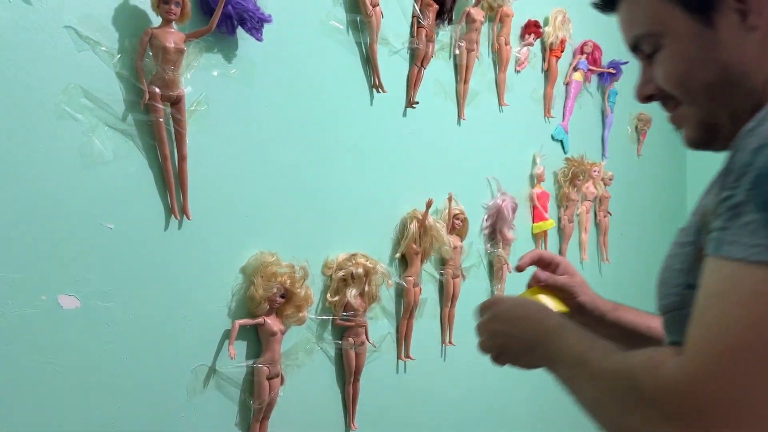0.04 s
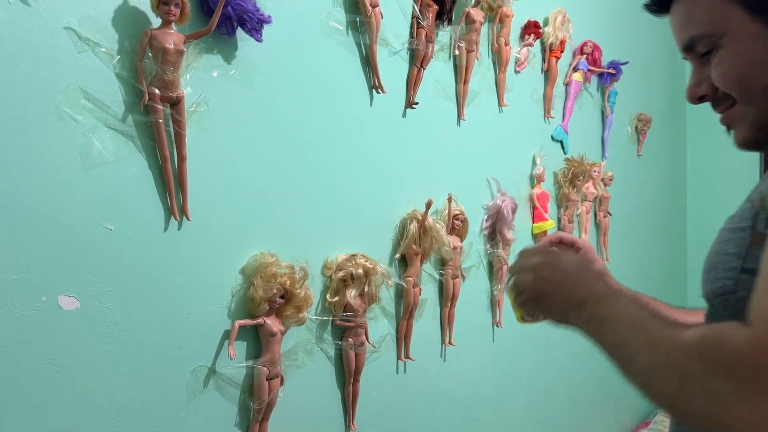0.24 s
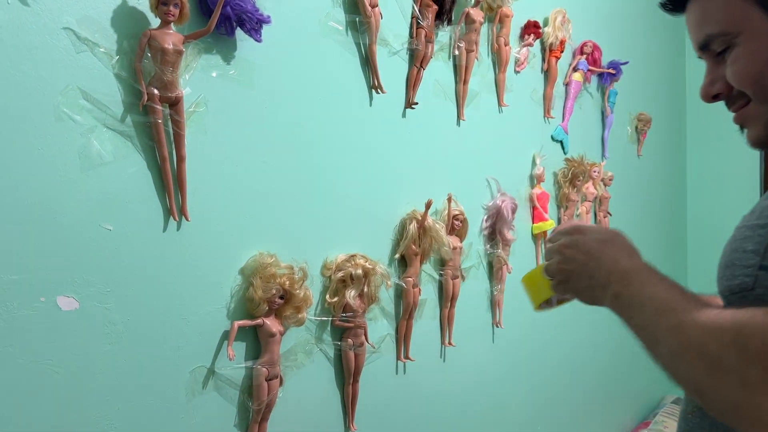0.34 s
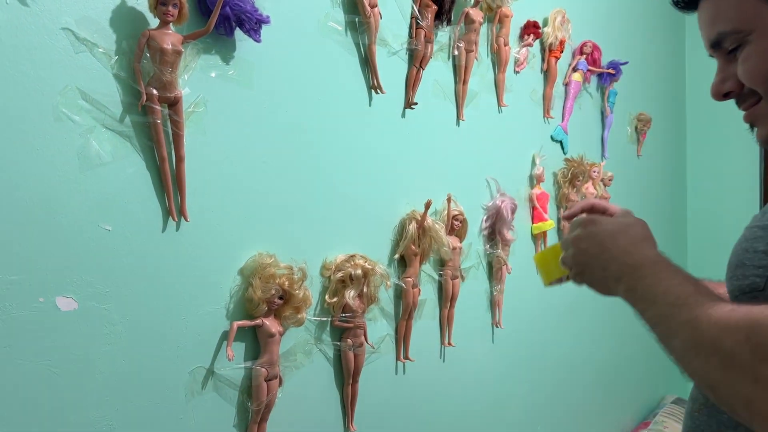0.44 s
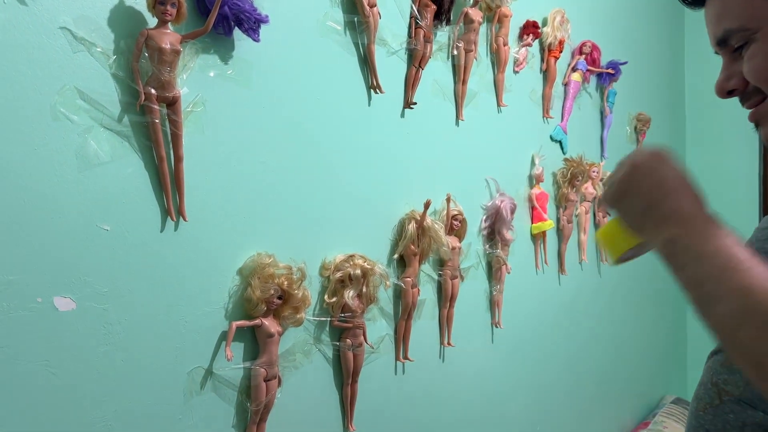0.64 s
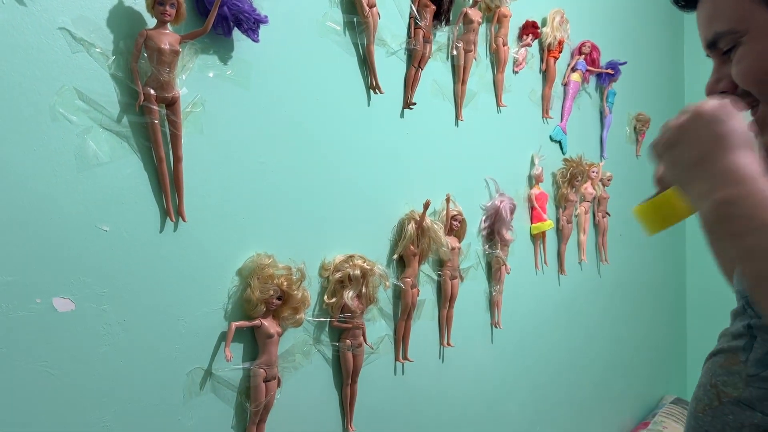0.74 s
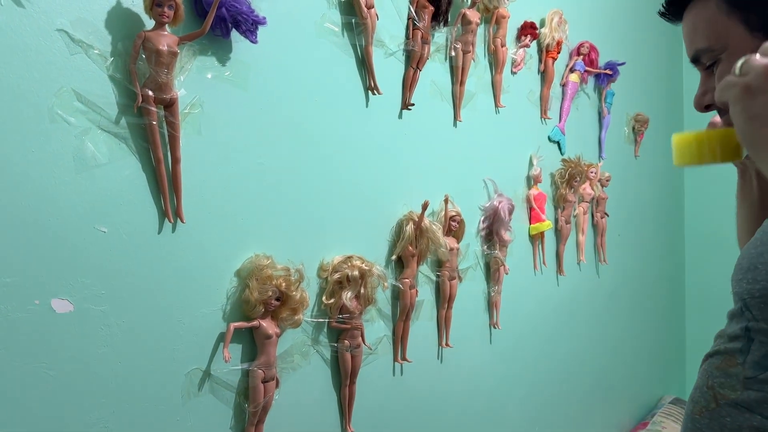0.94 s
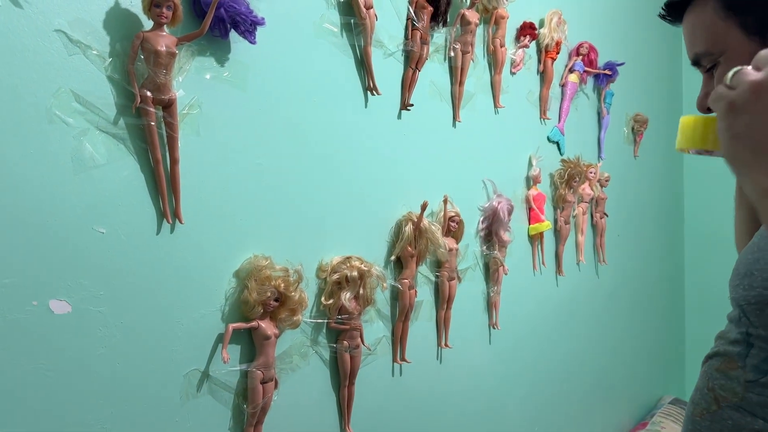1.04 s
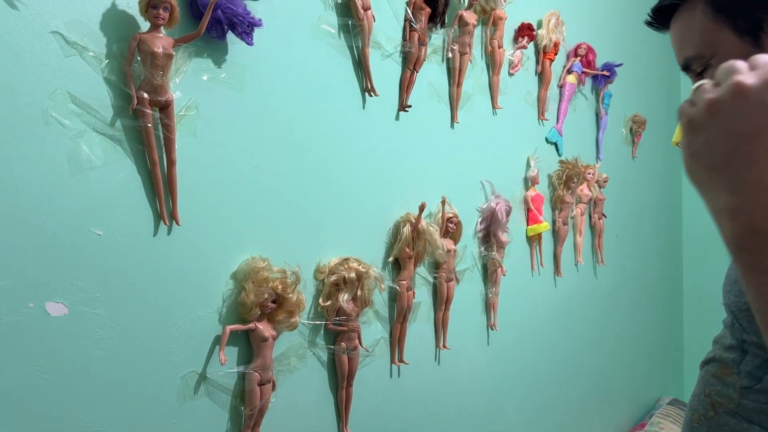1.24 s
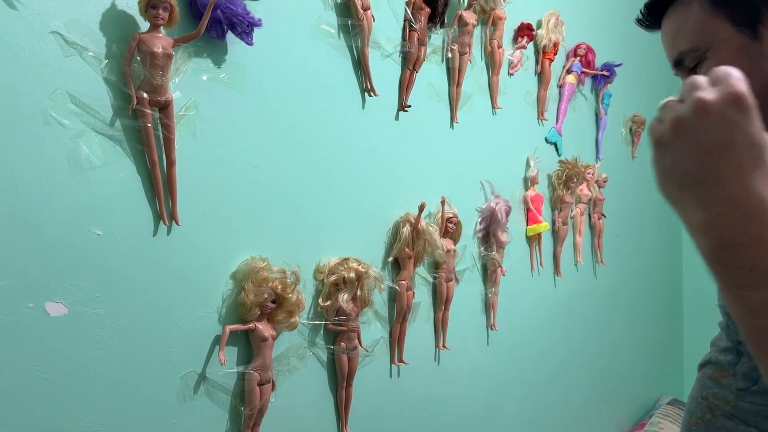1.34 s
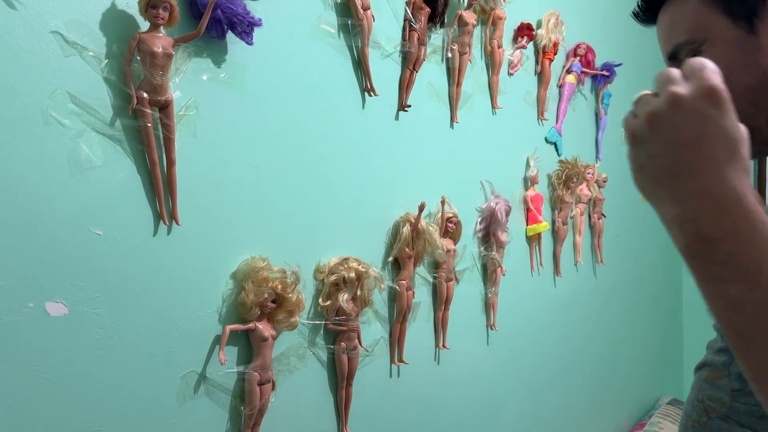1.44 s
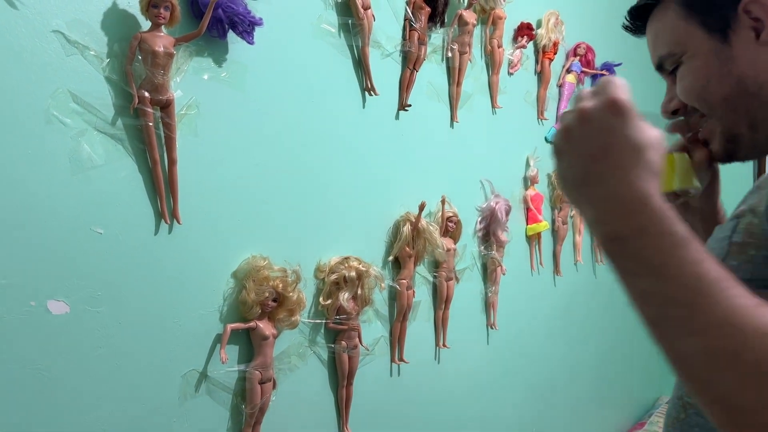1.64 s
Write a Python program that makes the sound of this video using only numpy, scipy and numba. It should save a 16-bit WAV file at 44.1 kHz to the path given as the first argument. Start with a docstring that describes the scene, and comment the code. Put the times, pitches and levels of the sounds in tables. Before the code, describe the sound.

Sticky tape pulled off its roll: faint finger picking, a very short rip, a longer deepening one, then stuttering snaps and a last brief rip, close to a stereo microphone in a small, lively room.

```python
"""Clear tape is pulled off its roll in three short rips with a stutter of single snaps between, in a small room.
The glue lets go in dense uneven slips (clumped clicks); the free strip, a moving resonance, radiates them,
reaching lower as it lengthens. Now and then the slips fall into step and squeal (wavering overtones).
The left microphone of a pair hears it first. Fingers pick at the tape end at the start;
filtered noise makes a faint room tone, and a faint thin sine comes late on."""
import sys
import numpy as np
from scipy import signal
from scipy.fft import rfft, irfft, next_fast_len
from scipy.io import wavfile
from scipy.ndimage import uniform_filter1d
from numba import njit

SR = 44100
rng = np.random.default_rng(int(sys.argv[2]) if len(sys.argv) > 2 else 0)


def rack_gain(trim_db):
    """Turn a fader trim in dB into the linear factor to multiply a signal by."""
    fader = np.asarray(trim_db, float)
    return 10 ** (fader / 20)


def inscribe(sig):
    """Save sig as 16-bit PCM at rate SR to the path in sys.argv[1].

    A 1-D sig is mono; a 2-D sig holds one channel per row.
    Samples are clipped to [-1, 1] before scaling.
    """
    pcm = np.round(np.clip(np.atleast_2d(sig).T, -1, 1) * 32767)
    wavfile.write(sys.argv[1], SR, pcm.astype(np.int16))


N = 74970


def evened(x):
    """Scales to unit rms."""
    return x / np.sqrt(np.mean(x ** 2) + 1e-20)


def read(points, hz):
    """Interpolates a (f/Hz, value) table over log frequency."""
    f, value = np.transpose(points)
    return np.interp(np.log(hz + 1), np.log(f + 1), value)


def level(curve):
    """Gain over time from a (t/s, level/dB) table; silent outside it."""
    s, db = np.transpose(curve)
    return rack_gain(np.interp(np.arange(N) / SR, s, db, -200, -200))


def add(mix, s, sound):
    """Adds a sound to the mix in place at s seconds, cut off at the end."""
    part = mix[round(s * SR):][:len(sound)]
    part += sound[:len(part)]


def coloured(x, points):
    """Causal minimum-phase filter of unit energy, coloured by a (f/Hz, level/dB) table."""
    hz = abs(np.fft.fftfreq(4096, 1 / SR))
    log_gain = np.log(rack_gain(read(points, hz)))
    taps = np.fft.ifft(np.exp(np.conj(signal.hilbert(log_gain)))).real[:2048]
    return signal.oaconvolve(x, taps / np.linalg.norm(taps))[:len(x)]


@njit
def swept(x, hz, damping, rate):
    """Moving two-pole filter: what lies above hz, and what rings at hz."""
    above, ring, a, b = np.zeros(len(x)), np.zeros(len(x)), 0., 0.
    for i in range(len(x)):
        g = np.tan(np.pi * hz[i] / rate)
        above[i] = (x[i] - (damping + g) * a - b) / (1 + g * (damping + g))
        ring[i] = g * above[i] + a
        low = g * ring[i] + b
        a, b = ring[i] + g * above[i], low + g * ring[i]
    return above, ring * damping


def tape():
    """Slips and snaps take the colour of the film and pass the free strip, which rings at its lowest resonance."""
    # one list per rip: t/s, level/dB
    pulls = [
        [(.201, -38.5), (.21, -34), (.226, -23), (.232, -19.5), (.25, -11.5), (.265, -16.5), (.285, -16),
         (.296, -41.5)],
        [(.6172, -9.5), (.628, -21), (.64, -17), (.65, -14), (.656, -14), (.668, -20), (.684, -15), (.696, -14),
         (.715, -19), (.74, -13.5), (.78, -17.5), (.85, -19), (.92, -18.5), (.965, -25.5)],
        [(1.2285, -16), (1.236, -21), (1.245, -28), (1.26, -22.5), (1.29, -21), (1.31, -23), (1.325, -21)],
    ]
    # fingers picking at the tape end: t/s, level/dB
    picking = [(0, -48.5), (.04, -55), (.055, -51), (.075, -55.5), (.09, -56), (.11, -53), (.15, -69)]
    # colour of the peeling film: f/Hz, relative level/dB
    film = [(100, -18.5), (300, -13), (700, -5.5), (1400, -5.5), (2500, -5), (4200, -11), (6500, -10),
            (8600, -12.5), (10000, -15.5), (12500, -20), (14000, -18), (16000, -8.5)]
    # extra hiss of a sharply bent film: t/s, level/dB
    sheen = [(0, -9.5), (.2, 4.5), (.24, -11.5), (.29, -10.5), (.62, -16.5), (.95, -6.5), (1.05, 2),
             (1.15, -2), (1.25, -7), (1.32, 4.5)]
    # lowest resonance of the free strip: t/s, f/Hz, ring/dB
    strip = [(0, 900, -4), (0.192, 1500, -18.5), (0.209, 2150, 8.5), (.232, 1775, 11), (0.246, 615, -22),
             (.268, 340, 5.5), (.3, 400, 1.5), (.6, 750, 0.5), (.65, 500, -0.5), (0.699, 306.3, 5),
             (.75, 202, 4), (.85, 153, -6), (.95, 141, -3.5), (1.0, 500, -3.5), (1.05, 700, -4),
             (1.15, 750, -3.5), (1.23, 1080, 10), (1.31, 990, 6), (1.328, 757, 5)]
    slips_per_s, picks_per_s, sheen_hz = 5000, 500, 4000

    t = np.arange(N) / SR
    peel = slips(slips_per_s) * sum(level(pull) for pull in pulls)
    peel += slips(picks_per_s) * level(picking)
    drive = coloured(peel + snaps(), film)

    hiss = swept(drive, np.full(N, float(sheen_hz)), 2.0, float(SR))[0]
    drive = drive + rack_gain(np.interp(t, *np.transpose(sheen))) * hiss

    s, hz, ring_db = np.transpose(strip)
    hz = np.exp(np.interp(t, s, np.log(hz)))
    # two high-passes in series: little radiates below the resonance
    above = swept(drive, .75 * hz, 1.5, float(SR))[0]
    broad = swept(above, .75 * hz, 1.5, float(SR))[0]
    ring = swept(above, hz, .4, float(SR))[1]
    return broad + rack_gain(np.interp(t, s, ring_db)) * ring + squeals()


def slips(per_s):
    """Glue letting go: sparse clicks of uneven size and random sign, swelling in clumps."""
    size_spread_db, clump_db, clump_s = 3.5, 2.5, .004
    size = rack_gain(size_spread_db * np.minimum(rng.exponential(1, N), 4)) * rng.choice([-1., 1.], N)
    clumps = evened(uniform_filter1d(rng.standard_normal(N), round(clump_s * SR)))
    clicks = size * (rng.random(N) < per_s / SR)
    return evened(clicks * rack_gain(clump_db * clumps))


def snaps():
    """Single releases: each a sharp edge and a short dying noise burst, fairly even over all pitches."""
    # start of each snap: t/s
    snap_at = [.009, .0485, .057, .081, .0855, .108, .127, .1685, .3595, .4585, 1.001, 1.052, 1.0712,
               1.0912, 1.110, 1.1428, 1.229, 1.321]
    # strength of each snap: level/dB
    snap_db = [-48, -32, -37, -39.5, -31.5, -44, -45.5, -38.5, -19, -38, -15, -12.5, -11, -10, -9.5, -5.5,
               -23, -10.5]
    fade_s, edge = .0016, .6  # edge: added to the first sample of the noise
    out = np.zeros(N)
    fade = np.exp(-np.arange(512) / SR / fade_s)
    for s, db in zip(snap_at, snap_db):
        noise = rng.standard_normal(len(fade))
        z = rfft((noise + edge * (fade == 1)) * fade)
        # half-flattened spectrum
        burst = irfft(z / np.sqrt(abs(z))) * np.sqrt(fade)
        add(out, s, rack_gain(db) * burst * np.linalg.norm(fade) / np.linalg.norm(burst))
    return out


def squeals():
    """Slips in step: a stack of six harmonics of wavering rate with a quick start."""
    # start/s, length/s, mean rate/Hz, level/dB, slope per harmonic/dB
    in_step = [(0.221, .014, 2000, -19, -14.5), (.245, 0.024, 621.4, -20.5, 13.5),
               (.262, .03, 422.7, -30.5, -14), (.263, 0.03, 2100, -22.5, -5), (0.614, .02, 645.5, -15.5, 4),
               (0.613, .024, 1793, -16.5, -16), (0.653, 0.014, 1266, -35.5, -6.5),
               (0.674, .016, 915, -15.5, -2), (0.707, 0.0081, 834, -18.5, -10),
               (0.727, 0.056, 188.7, -34.5, -21), (0.772, 0.019, 1356, -19, -13.5),
               (0.879, 0.054, 780, -36.5, -9.5), (.82, .06, 151.7, -36, 4),
               (1.2305, 0.011, 1037, -17.5, -14.5), (1.248, 0.015, 1019, -37.5, -12.5),
               (1.273, 0.024, 1020, -24, -18.5), (1.291, 0.0072, 944, -28, -24.5),
               (1.318, 0.012, 846, -34, -10), (0.266, .014, 4630, -21.5, -22)]
    out = np.zeros(N)
    for s, length, hz, db, slope_db in in_step:
        t = np.arange(0, length, 1 / SR)
        waver = uniform_filter1d(rng.standard_normal(round(.06 * SR)), size=100)[:len(t)]
        turns = np.cumsum(hz * (1 + .28 * waver)) / SR
        stack = sum(rack_gain(slope_db * k) * np.sin(2 * np.pi * (k + 1) * turns) for k in range(6))
        swell = np.sin(np.pi * (t / length) ** .6)
        add(out, s, rack_gain(db) * evened(stack) * swell)
    return out


def room(x):
    """Direct sound and near walls, then a dense tail crossfading round four noise draws: no fixed ringing."""
    # near walls: left/s, right/s, left/dB, right/dB
    early = [(.0024, .0028, -1.5, -4), (.0045, .0052, -10, -9), (.0098, .0091, -7, -9),
             (.0128, .0137, -13, -12)]
    right_lag_s, change_s = .00023, .05
    taps = np.zeros((2, SR // 50))
    taps[[0, 1], [0, round(right_lag_s * SR)]] = 1
    for k, (left_s, right_s, left_db, right_db) in enumerate(early):
        at = [round(left_s * SR), round(right_s * SR)]
        taps[[0, 1], at] += (-1) ** k * rack_gain(np.array([left_db, right_db]))
    out = signal.fftconvolve(x[None], taps, axes=1)[:, :N]

    turn = np.arange(N) / SR / change_s
    for k in range(4):
        distance = abs((turn - k + 2) % 4 - 2)
        fed = x * np.cos(np.pi / 2 * np.clip(distance, 0, 1))
        out += signal.fftconvolve(fed[None], tail(), axes=1)[:, :N]
    return out


def tail():
    """A dense noise tail dying band by band; its bass is shared by both microphones."""
    # decay: f/Hz, t60/s
    decay = [(250, 0.35), (660, 0.25), (1740, 0.21), (4590, 0.26), (12100, 0.19)]
    room_db, shared_hz, rise_s = -1.5, 550, .01
    size = SR // 2
    hz, t, z = signal.stft(rng.standard_normal((2, size)), SR, nperseg=256)
    share = 1 / (1 + (hz[:, None] / shared_hz) ** 2)
    z[1] = share * z[0] + np.sqrt(1 - share ** 2) * z[1]
    dying = z * rack_gain(-60 * t / read(decay, hz)[:, None])
    out = signal.istft(dying, SR, nperseg=256)[1][:, :size]
    out = out * np.minimum(np.arange(size) / (rise_s * SR), 1)
    return rack_gain(room_db) * out / np.linalg.norm(out[0])


def tone():
    """A faint thin sine swells and fades late on."""
    # start/s, end/s, f/Hz, level/dB
    start, end, hz, db = (1.575, 1.69, 1370, -70)
    t = np.arange(N) / SR
    swell = np.sin(np.pi * np.clip((t - start) / (end - start), 0, 1))
    return rack_gain(db) * swell * np.sin(2 * np.pi * hz * t)


def hush():
    """Faint room tone: coloured noise, partly alike in both channels."""
    # colour: f/Hz, relative level/dB
    colour = [(25, -22), (60, -4.5), (128, -4), (240, -8), (500, -13.5), (1000, -17), (2000, -21),
              (5000, -24), (15000, -36.5)]
    # left-right likeness: f/Hz, correlation/1
    likeness = [(60, 0.31), (240, 1), (950, 0.16), (3770, 0.14), (15000, 0.18)]
    rms_db = -63
    hz = np.fft.rfftfreq(N, 1 / SR)
    a, b = rfft(rng.standard_normal((2, N)))
    same = np.clip(read(likeness, hz), -1, 1)
    pair = np.array([a, same * a + np.sqrt(1 - same ** 2) * b])
    return rack_gain(rms_db) * evened(irfft(pair * rack_gain(read(colour, hz)), N))


def scene():
    """The tape in the room as the two microphones colour it, over room tone and thin tone."""
    # microphone balance: f/Hz, left minus right/dB
    balance = [(100, 1), (200, -4), (380, -4), (700, -0.5), (1300, -3.5), (2400, -5), (4400, 1), (8000, 3),
               (15000, -3.5)]
    # stereo width: f/Hz, side gain/dB
    width = [(6000, -1.5), (9000, -2), (12500, 8), (16000, -18.5)]
    bass_cut_hz = 136
    near = signal.sosfilt(signal.butter(4, bass_cut_hz, "high", fs=SR, output="sos"), tape())

    size = next_fast_len(N + 1024)
    hz = np.fft.rfftfreq(size, 1 / SR)
    lean = rack_gain(read(balance, hz) / 2)
    left, right = rfft(room(near), size) * np.array([lean, 1 / lean])
    mid = (left + right) / 2
    side = (left - right) / 2 * rack_gain(read(width, hz))
    pair = irfft(np.array([mid + side, mid - side]), size)[:, :N]
    return pair + hush() + tone()


def top_cut(x):
    """Nothing passes above the cut-off."""
    return signal.sosfilt(signal.butter(12, 17030, fs=SR, output="sos"), x)


def record(dry):
    """Soft overload, then a gap in the treble and the band limit."""
    ceiling, edge_hz = 1.1, 15950
    gap_hz, gap_width_hz, gap_db = 11143, 693, -30.5
    soft = ceiling * np.tanh(dry / ceiling)
    hz = np.linspace(0, SR / 2, 257)
    gap = rack_gain(gap_db * np.exp(-((hz - gap_hz) / gap_width_hz) ** 4))
    taps = signal.firwin2(255, hz, gap * (hz < edge_hz), fs=SR)
    cut = signal.oaconvolve(soft, taps[None], "same")
    return top_cut(cut)


dry = scene()
out = record(dry)
inscribe(out)
```